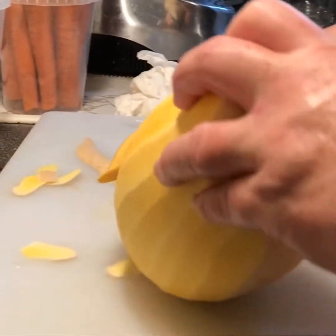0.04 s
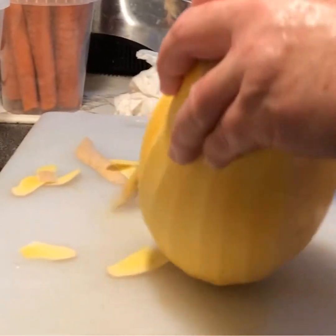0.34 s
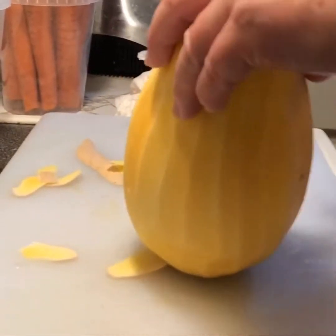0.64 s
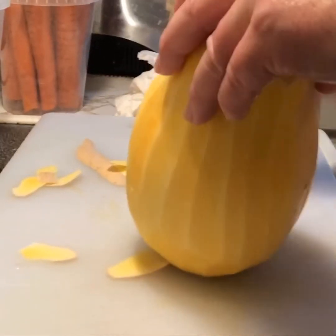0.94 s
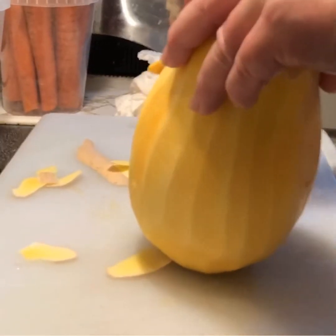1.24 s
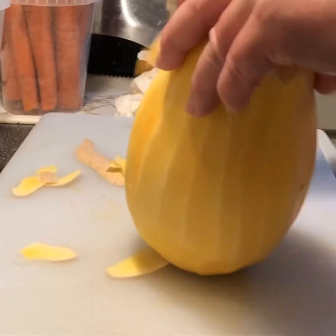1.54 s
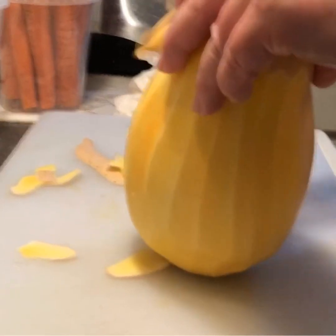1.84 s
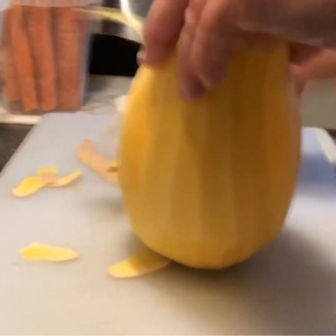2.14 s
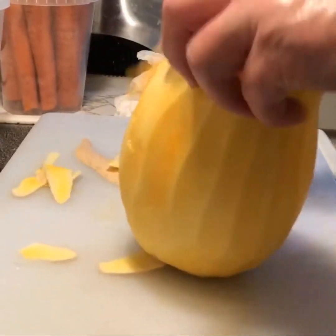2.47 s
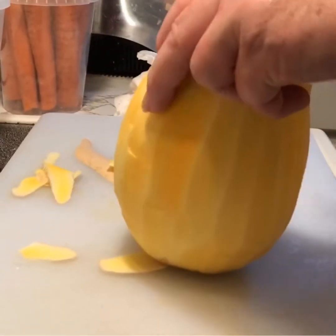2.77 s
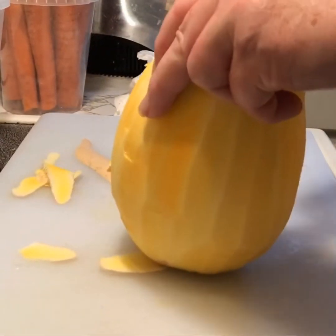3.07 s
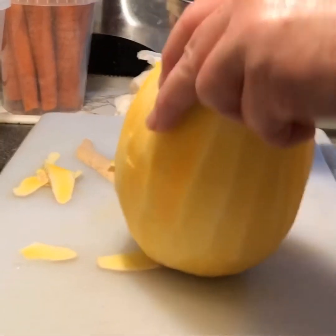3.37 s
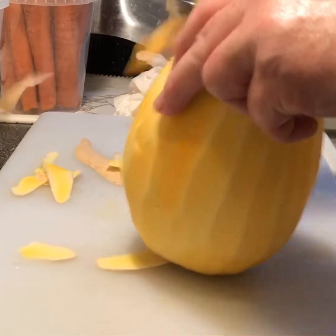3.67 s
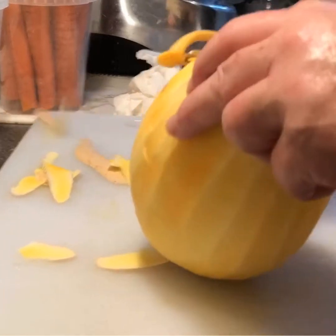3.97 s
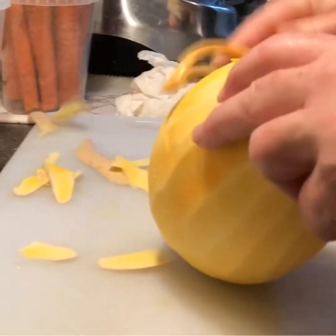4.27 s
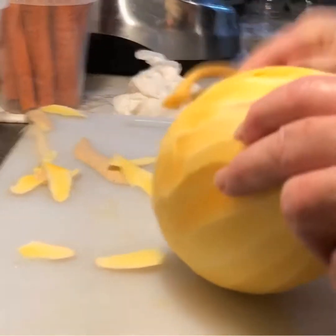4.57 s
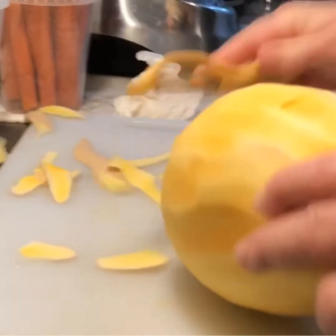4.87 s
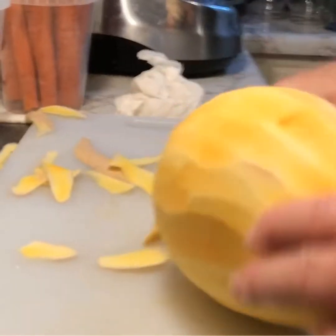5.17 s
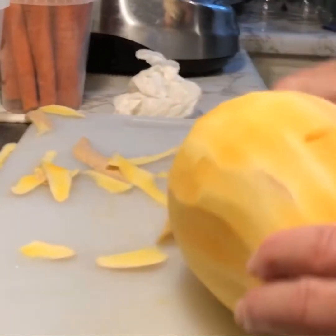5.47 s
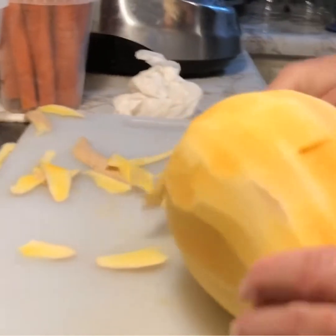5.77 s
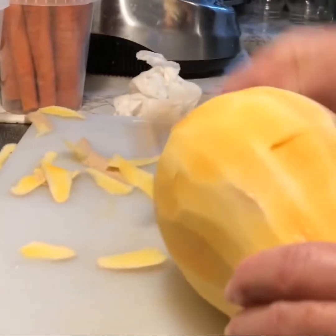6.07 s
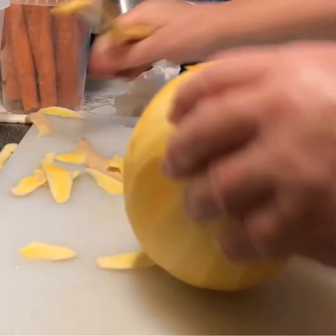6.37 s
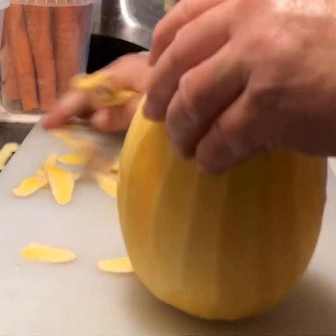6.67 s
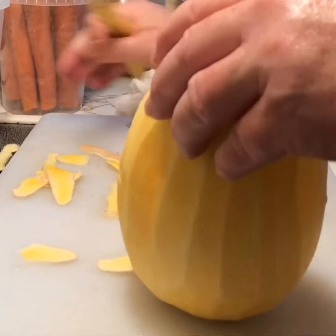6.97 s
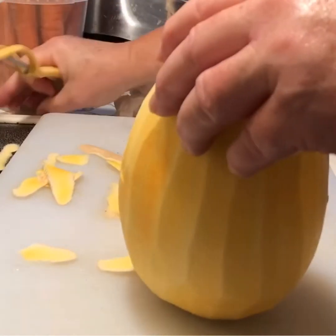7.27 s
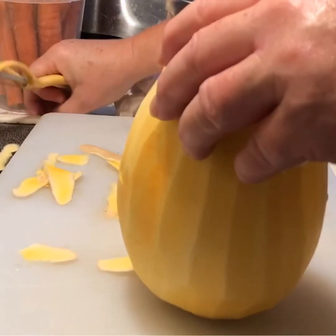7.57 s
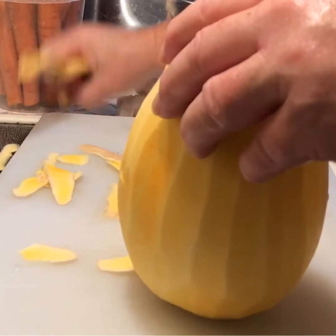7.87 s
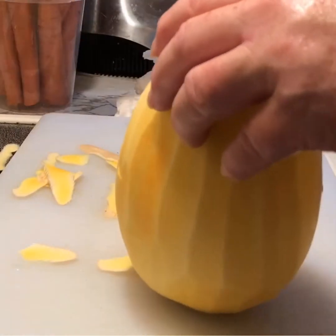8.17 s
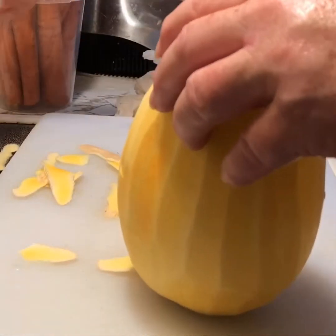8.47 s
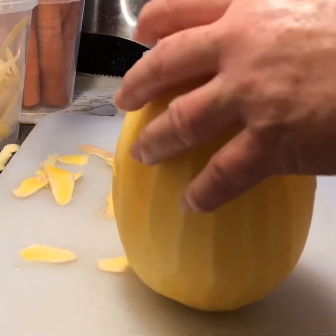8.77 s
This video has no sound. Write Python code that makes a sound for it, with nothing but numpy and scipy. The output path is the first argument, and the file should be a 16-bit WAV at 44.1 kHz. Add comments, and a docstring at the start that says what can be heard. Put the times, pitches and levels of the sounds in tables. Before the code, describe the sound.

Close up in a small kitchen, a swivel peeler takes strips off a raw squash. Its loose steel blade clicks and rattles between short, crisp scrapes, and now and then knocks sharply on a plastic cutting board. The irregular strokes grow busier, then stop. The peeler clacks down and the squash settles with a few dull bumps. An appliance hums low throughout.

```python
"""Peeling a squash

Close microphone in a small kitchen: a swivel peeler takes strips off a raw squash on a plastic board.
The loose blade clicks as it meets the squash, hisses through the crisp skin and, after a hard stroke,
knocks on the board. The squash bumps dully as it is turned, the peeler clacks as it is put down,
and an appliance hums throughout."""
import sys
import numpy as np
from scipy import signal
from scipy.fft import rfft, irfft, next_fast_len
from scipy.io import wavfile
from scipy.ndimage import uniform_filter1d, map_coordinates

SR = 44100
rng = np.random.default_rng(int(sys.argv[2]) if len(sys.argv) > 2 else 0)


def to_wav(s):
    """Save 16-bit WAV."""
    ch = np.atleast_2d(s).T  # columns
    pcm = np.round(np.clip(ch, -1, 1) * 32767)  # PCM
    wavfile.write(sys.argv[1], SR, pcm.astype(np.int16))


N = 388962
T = np.arange(SR // 2) / SR  # seconds within one event
TOP_HZ = 15900

# The steel blade, pressed against the squash. Each row: mode in Hz, level in dB, t60 in seconds.
BLADE_MODES = [(3734, -2, 0.028), (4400, 11, 0.026), (5670, 7, 0.061), (5850, 6, 0.075), (6860, 6.5, 0.067),
               (7630, -10, .04), (9080, 6, .045)]
# The peeler's parts striking each other. Each row: frequency in Hz, spectral level in dB.
CRACK_SPECTRUM = [(500, -18.5), (2100, 10), (2600, 3), (3200, 5.5), (4200, 7.5), (5700, 7.5), (8000, -2),
                  (9500, 2.5), (12000, -9), (16000, -1)]


def amp(db):
    """Decibels to gain."""
    return 10 ** (np.asarray(db) / 20)


def unit(x, span=None):
    """x scaled to rms 1, over its first span seconds if given."""
    return x / np.sqrt(np.mean(x[:span and int(span * SR)] ** 2) + 1e-20)


def along(points, hz):
    """(Hz, value) points read on a log axis."""
    freqs, values = np.transpose(points)
    return np.interp(np.log(hz + 1), np.log(freqs), values)


def wobble(rate, size):
    """A smooth random curve with rate knots a second."""
    knots = rng.standard_normal(int(size * rate / SR) + 4)
    return map_coordinates(knots, [np.arange(size) * rate / SR])


def colour(x, spectrum):
    """Causal (minimum-phase) filter through (Hz, dB) points."""
    size = 2 * next_fast_len(len(x) // 2 + 2048)
    gain = amp(along(spectrum, np.fft.rfftfreq(size, 1 / SR)))
    cepstrum = irfft(np.log(gain), size)
    cepstrum[1:size // 2] *= 2
    cepstrum[size // 2 + 1:] = 0
    return irfft(rfft(x, size) * np.exp(rfft(cepstrum)), size)[:len(x)]


def contact(spectrum, attack, t60, span=0.01):
    """A burst of tiny collisions that builds and dies quickly, rms 1 over its first span seconds."""
    envelope = (1 - np.exp(-T / attack)) * amp(-60 * T / t60)
    return unit(colour(envelope * rng.standard_normal(len(T)), spectrum), span)


def ring(modes, detune, spread_db=1.5):
    """Damped modes; each blow lands elsewhere and so shifts their strength and pitch."""
    hz, db, t60 = np.transpose(modes)[:, :, None]
    strength, shift, phase = rng.standard_normal((3, len(modes), 1))
    envelopes = amp(db + spread_db * strength - 60 * T / t60)
    waves = np.sin(2 * np.pi * (hz * (1 + detune * shift) * T + phase))
    onset = 1 - np.exp(-T / 0.0007)
    return unit((envelopes * waves).sum(0) * onset, span=0.01)


def add(out, start, x, room_db):
    """Mix an event in at start seconds, with the kitchen's diffuse answer."""
    # The small room's decay. Each row: frequency in Hz, t60 in seconds.
    kitchen_decay = [(150, 0.25), (600, 0.35), (1600, 0.3), (6000, 0.28), (10000, 0.22), (16000, 0.16)]
    hz, t, noise = signal.stft(rng.standard_normal(len(T)), SR, nperseg=256)
    decay = amp(-60 * t / along(kitchen_decay, hz)[:, None])
    tail = signal.istft(noise * decay, SR, nperseg=256)[1][:len(T)]
    tail *= 1 - np.exp(-T / 0.0042)
    wet = signal.fftconvolve(x, tail / np.linalg.norm(tail))[:len(T)]
    slot = out[round(start * SR):][:len(T)]
    slot += (x + amp(room_db) * wet)[:len(slot)]


def appliance():
    """Room tone: a steady rush of air with a motor's low, wavering hum."""
    # The rush of air. Each row: frequency in Hz, spectral level in dB.
    air_spectrum = [(25, -54), (45, -24), (70, -3.5), (87, -11.5), (123, -5), (195, -20), (290, -13.5),
                    (384, -21), (550, -17.5), (780, -21.5), (1300, -22), (4000, -33), (9000, -43.5),
                    (16000, -52.5)]
    # The motor's tones. Each row: frequency in Hz, rms level in dB, waver in dB.
    hum_tones = [(59.7, -59.5, 2), (95, -68, 13), (120.6, -56, 1.5)]
    out = amp(-52) * unit(colour(rng.standard_normal(N), air_spectrum))
    t = np.arange(N) / SR
    for hz, db, waver_db in hum_tones:
        waver = amp(waver_db * wobble(5.2, N))
        drift = 0.26 * waver_db * wobble(5.7, N)
        out += amp(db) * unit(waver * np.sin(2 * np.pi * hz * t + drift))
    return out


def touch(x, bright_db, ripple_db):
    """A sharper contact has more top, and the spot touched favours some resonances."""
    hz = np.geomspace(800, 16000, num=40)
    shelf = along([(5500, 0), (11500, bright_db)], hz)
    ripple = ripple_db * rng.standard_normal(len(hz))
    return colour(x, np.transpose([hz, shelf + ripple]))


def click(bright_db):
    """The blade snaps against its stop: a tick and a short steel ring."""
    # The tick. Each row: frequency in Hz, spectral level in dB.
    tick_spectrum = [(150, -4.5), (800, -12.5), (1400, -4), (2200, -12), (3100, -0.5), (5000, 0.5),
                     (6500, 5.5), (8000, -2.5), (9200, 0), (12000, -8), (16000, -10.5)]
    tick = contact(tick_spectrum, attack=0.0015, t60=0.04)
    steel = amp(-6.5) * ring(BLADE_MODES, detune=0.032)
    return touch(tick + steel, bright_db + 5, ripple_db=2.5)


def curling(x, patchy_db):
    """Resonances come and go as the curling strip lengthens."""
    frames = signal.stft(x, nperseg=256)[2]
    patches = uniform_filter1d(rng.standard_normal(frames.shape), size=4, axis=0)
    patches = uniform_filter1d(patches, size=6, axis=1)
    return signal.istft(frames * amp(patchy_db * unit(patches)), nperseg=256)[1][:len(x)]


def scrape(length, bright_db):
    """The edge sinks in and bursts cell after cell of the skin: a hiss that swells and catches."""
    # The bursting skin. Each row: frequency in Hz, spectral level in dB.
    cut_spectrum = [(80, 1), (250, -0.5), (500, -2.5), (800, -7), (1400, -1.5), (2500, 0.5), (3400, 3.5),
                    (5000, 1), (6800, 3), (10500, 0.5), (13000, 3), (16000, -2)]
    cells_per_s, bite_share = 16000, 0.2
    cells = rng.standard_normal(len(T)) * (rng.random(len(T)) < cells_per_s / SR)
    progress = np.minimum(T / max(length, 0.01), 1)
    speed = amp(2.2 * np.sin(np.pi * progress))  # the hand is fastest in mid-stroke
    bite = np.minimum(progress / bite_share, 1)
    release = amp(-60 * np.maximum(T - length, 0) / 0.038)
    fibres = amp(1.95 * wobble(57.6, len(T)) + 1.8 * wobble(433, len(T)))
    hiss = curling(colour(cells * fibres, cut_spectrum), patchy_db=2.2)
    return speed * bite * release * unit(touch(hiss, bright_db, ripple_db=1.1))


def landings():
    """The swivelling blade lands or rebounds on the squash with a click, then skims the skin."""
    # Each row: start in seconds, level in dB, relative brightness in dB.
    blade_landings = [(0.3045, -45, 2), (0.389, -42, -10), (0.6818, -36.5, -3.5), (0.969, -45, -17),
                      (1.116, -31, -15.5), (1.6914, -38, -12), (2.19, -46, -13), (2.3872, -44.5, 1),
                      (2.395, -40.5, 2), (3.5652, -47, -12), (3.5817, -36, -2.5), (3.9539, -38.5, -5),
                      (3.9608, -32.5, -2.5), (4.141, -49, -2), (4.3125, -32.5, 1.5), (4.5789, -30.5, -6),
                      (4.8046, -40.5, 15), (5.0035, -31, -12), (5.237, -31.5, -1), (5.422, -26.5, -3.5),
                      (5.464, -37, -20), (5.5169, -33, -5.5), (5.662, -39, -14), (5.959, -40, -28),
                      (7.256, -51, -12), (7.6372, -55.5, 10)]
    out = np.zeros(N)
    for start, db, bright_db in blade_landings:
        add(out, start, amp(db) * click(bright_db), room_db=-9.5)
        skim = scrape(length=0.034, bright_db=2)
        add(out, start + 0.012, amp(db - 19.5) * skim, room_db=-5.5)
    return out


def rubbing():
    """Blade or hand slides over the squash without biting: the grain of a cut, but dull."""
    # Each row: start in seconds, length in seconds, level in dB.
    slides = [(0.337, 0.05, -43), (0.771, 0.079, -49.5), (1.793, 0.028, -48.5), (2.486, 0.049, -50),
              (6.182, 0.22, -63.5), (6.57, 0.17, -61.5), (7.234, 0.28, -62.5), (8.475, 0.084, -55)]
    out = np.zeros(N)
    for start, length, db in slides:
        add(out, start, amp(db) * scrape(length, bright_db=-8.5), room_db=-13)
    return out


def slap():
    """A flat blow rings the plastic board briefly and leaves a diffuse shudder."""
    # The board's ring. Each row: mode in Hz, level in dB, t60 in seconds.
    board_modes = [(982, -9.5, 0.046), (1201, -7, 0.079), (1491, 1, 0.05), (2008, -2.5, 0.053),
                   (3174, -5, 0.025)]
    # The blow and its after-ring. Each row: frequency in Hz, spectral level in dB.
    slap_spectrum = [(100, -31), (260, -13.5), (750, -13), (1000, -4.5), (1500, -0.5), (2050, -8.5),
                     (2500, -15.5), (16000, -26)]
    shudder_spectrum = [(600, -29), (1100, -9), (1500, -4.5), (1850, -4), (2300, -19), (5000, -47)]
    shudder = amp(-15.5) * contact(shudder_spectrum, attack=0.0032, t60=0.26)
    blow = amp(-3) * contact(slap_spectrum, attack=0.0019, t60=0.041)
    board = amp(-3.5) * ring(board_modes, detune=0.021, spread_db=0.5)
    return blow + board + shudder


def crack():
    """The blade is jolted hard in its holder."""
    jolt = contact(CRACK_SPECTRUM, attack=0.000087, t60=0.04)
    return jolt + amp(-8) * ring(BLADE_MODES, detune=0.0208)


def thump():
    """The heavy squash and the board bounce on the counter."""
    # The struck counter. Each row: frequency in Hz, spectral level in dB.
    counter_spectrum = [(42, -30), (70, 8.5), (105, -15), (155, 7), (190, -15.5), (250, 5), (380, -11),
                        (700, -17), (4000, -83)]
    # Squash and board together. Each row: mode in Hz, level in dB, t60 in seconds.
    bounce_modes = [(271, 7, 0.042), (160, -6.5, 0.11), (80, -16, 0.16)]
    counter = amp(-3.5) * contact(counter_spectrum, attack=0.00057, t60=0.18, span=0.059)
    return counter + amp(4.5) * ring(bounce_modes, detune=0.042, spread_db=1)


def knocks():
    """The peeler runs off the squash onto the board; only a hard knock cracks fully in the holder."""
    # Each row: start in seconds, level in dB, thump in dB relative to that level.
    board_hits = [(0.3457, -41, -5.5), (0.861, -26, -17), (1.45, -34, -15), (2.2022, -25.5, -19),
                  (4.409, -25.5, -16), (4.5794, -37, -25), (4.7863, -22, -13.5), (5.2031, -25.5, -15),
                  (5.488, -35.5, -6.5)]
    hard_db = -24
    out = np.zeros(N)
    for start, db, thump_db in board_hits:
        crack_db = 2.94 + 2.5 * min(db - hard_db, 0)
        knock = slap() + amp(crack_db) * crack() + amp(thump_db) * thump()
        add(out, start, amp(db) * knock, room_db=-11)
    return out


def clinks():
    """Lightly touched, the free blade rattles on its pivot: a brief ring roughened by tiny ticks."""
    # Each row: start in seconds, level in dB.
    light_touches = [(0.681, -39.5), (1.1165, -39), (1.6912, -48), (2.5253, -45), (2.548, -46.5),
                     (2.5662, -50), (2.5976, -45.5), (2.7342, -47), (2.772, -49), (6.2314, -52.5),
                     (7.0617, -57), (7.1723, -45), (7.205, -54), (8.1747, -60), (8.23, -46.5)]
    # The blade swinging free. Each row: mode in Hz, level in dB, t60 in seconds.
    loose_modes = [(2924, 0, 0.031), (3683, 0.5, 0.027), (5390, -13, .025), (6700, -10, .04)]
    out = np.zeros(N)
    for start, db in light_touches:
        steel = amp(-0.5) * ring(loose_modes, detune=0.03, spread_db=3)
        ticks = amp(-5) * contact(CRACK_SPECTRUM, attack=0.0006, t60=0.035)
        add(out, start, amp(db) * (steel + ticks), room_db=-8.5)
    return out


def rocking():
    """The squash rocks on the board with a low rumble."""
    # Each row: start in seconds, pitch in Hz, level in dB.
    rocks = [(0.766, 160, -48.5), (4.808, 127, -36), (6.65, 258, -44), (6.694, 190, -46)]
    out = np.zeros(N)
    for start, hz, db in rocks:
        spectrum = [(hz / 4, -36), (hz, 0), (2 * hz, -18), (TOP_HZ, -90)]
        rumble = contact(spectrum, attack=0.012, t60=0.12, span=0.06)
        add(out, start, amp(db) * rumble, room_db=-26)
    return out


def zings():
    """The blade sings on, thin and high, after a sharp snap."""
    # Each row: start in seconds, pitch in Hz, level in dB.
    blade_notes = [(1.118, 11500, -53), (2.235, 10810, -47)]
    out = np.zeros(N)
    for start, hz, db in blade_notes:
        add(out, start, amp(db) * ring([(hz, 0, 0.2)], detune=0.0018), room_db=1)
    return out


def cutting():
    """Each stroke scrapes off a strip, and the blade flicks back as the strip lets go."""
    # Each row: start and length in seconds, level in dB, closing click in dB relative to that level.
    strokes = [(1.197, 0.062, -43.5, -9), (1.373, 0.034, -43.5, -2), (1.832, 0.074, -41, -12),
               (2.138, 0.041, -46, -11), (2.205, .026, -37.5, 3), (3.291, 0.057, -40, -4.5),
               (3.656, 0.11, -42, -1.5), (4.067, .046, -40.5, 1.5), (4.326, 0.11, -44, -3),
               (4.613, 0.037, -43.5, -16), (4.744, 0.032, -45.5, -12), (5.143, 0.02, -43, 5),
               (5.229, 0.021, -38, -13), (5.673, 0.047, -43, 5.5), (5.963, 0.035, -49, 11.5)]
    out = np.zeros(N)
    for start, length, db, release_db in strokes:
        add(out, start, amp(db) * scrape(length, bright_db=0), room_db=-11)
        add(out, start + length, amp(db + release_db) * click(bright_db=-3), room_db=-9.5)
    return out


def thud():
    """A soft blow brings out the board's hollow note."""
    # The blow. Each row: frequency in Hz, spectral level in dB.
    thud_spectrum = [(60, -36), (170, -1), (270, 0), (390, -2), (570, 13), (850, -6), (1700, -4.5),
                     (2200, -17), (3300, -12.5), (16000, -61)]
    # The hollow note. Each row: mode in Hz, level in dB, t60 in seconds.
    hollow_modes = [(554, 2, 0.044), (645, -8, 0.032)]
    blow = amp(0.5) * contact(thud_spectrum, attack=0.0012, t60=0.049)
    return blow + amp(-4) * ring(hollow_modes, detune=0.03)


def bumps():
    """The squash settles on the board with a dull thud and tips back once."""
    # Each row: start in seconds, level in dB.
    settlings = [(4.803, -37), (6.7889, -37.5), (7.2632, -38.5), (7.3285, -44.5), (7.418, -48),
                 (8.448, -39.5), (8.5522, -39.5), (8.5712, -33), (8.703, -40)]
    tip_back_s, tip_loss_db = 0.048, 17
    out = np.zeros(N)
    for start, db in settlings:
        add(out, start, amp(db) * thud(), room_db=-9.5)
        add(out, start + tip_back_s, amp(db - tip_loss_db) * thud(), room_db=-9.5)
    return out


def clacks():
    """The peeler's handle clacks drily on the board as it is put down and moved."""
    # Each row: start in seconds, level in dB.
    handle_hits = [(6.649, -37.5), (6.7579, -24.5), (7.244, -44.5), (8.5585, -47)]
    out = np.zeros(N)
    for start, db in handle_hits:
        handle = contact(CRACK_SPECTRUM, attack=0.00041, t60=0.037)
        board = amp(-11.5) * slap() + amp(-14.5) * thud()
        add(out, start, amp(db) * (handle + board), room_db=-7.5)
    return out


def scene():
    """One microphone close to the board feeds both channels."""
    mono = appliance() + landings() + rubbing() + knocks() + clinks()
    mono += rocking() + zings() + cutting() + bumps() + clacks()
    return np.array([mono, mono])


def record(dry):
    """The recorder keeps nothing above its band limit."""
    size = next_fast_len(N + SR // 2)
    passband = np.fft.rfftfreq(size, 1 / SR) < TOP_HZ
    return irfft(rfft(dry, size) * passband, size)[:, :N]


dry = scene()
out = record(dry)
to_wav(out)
```